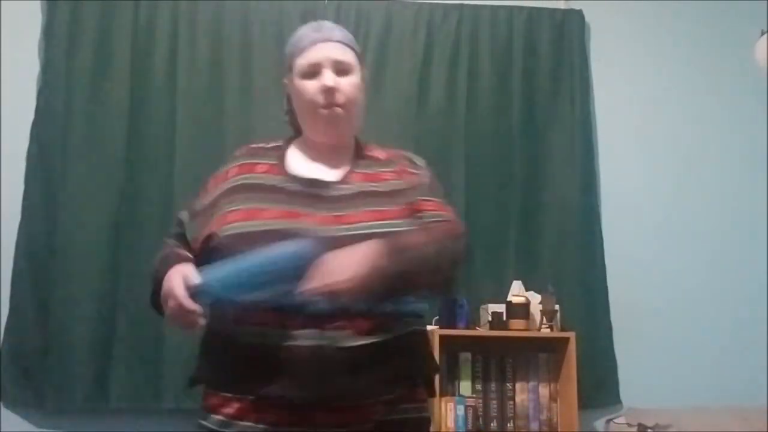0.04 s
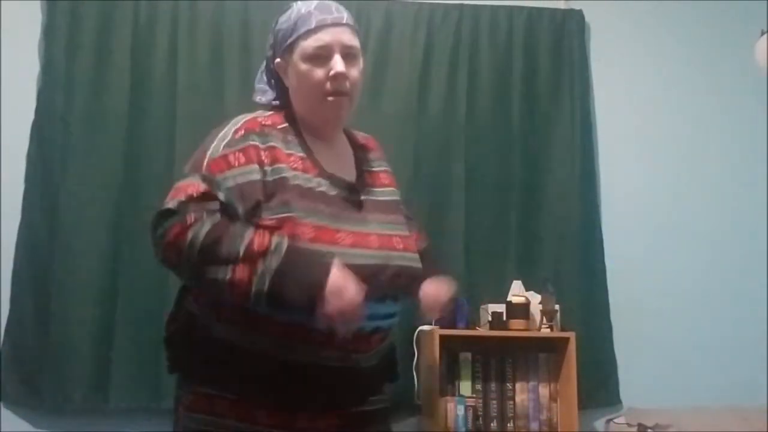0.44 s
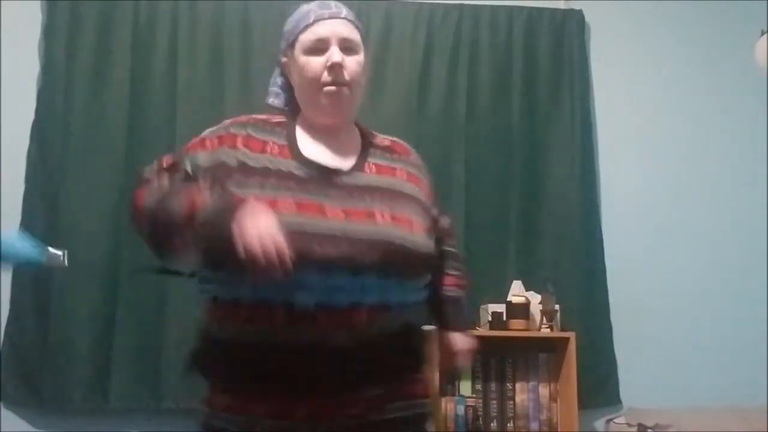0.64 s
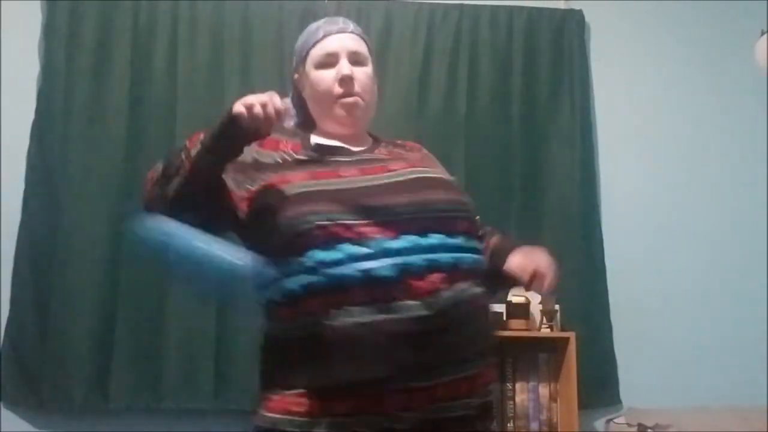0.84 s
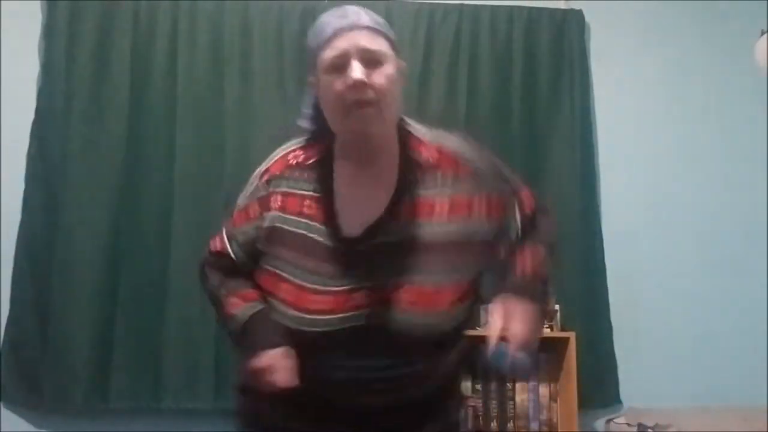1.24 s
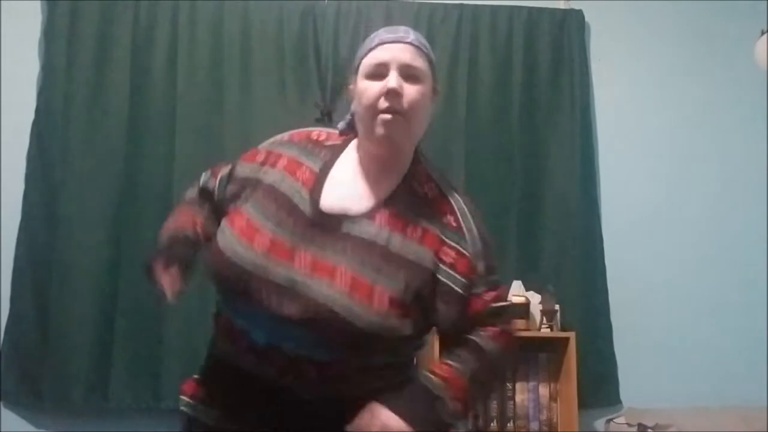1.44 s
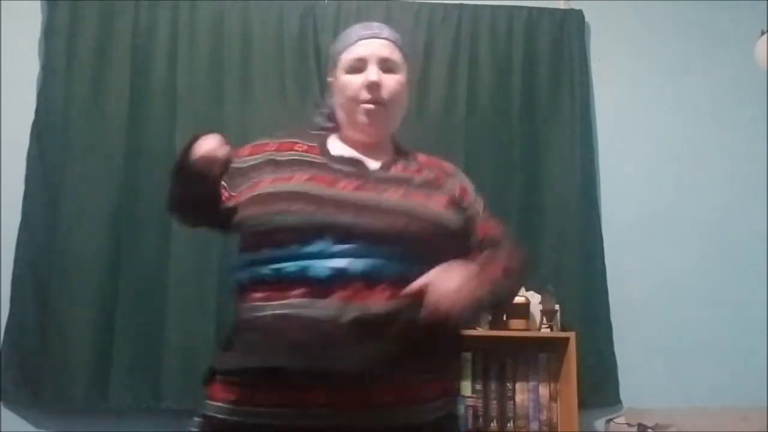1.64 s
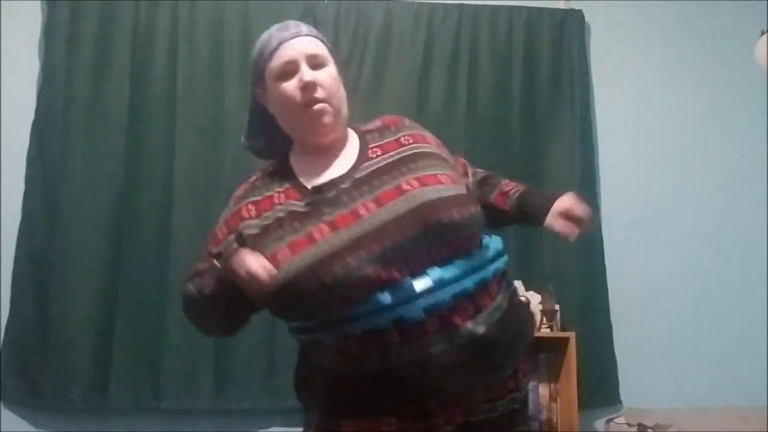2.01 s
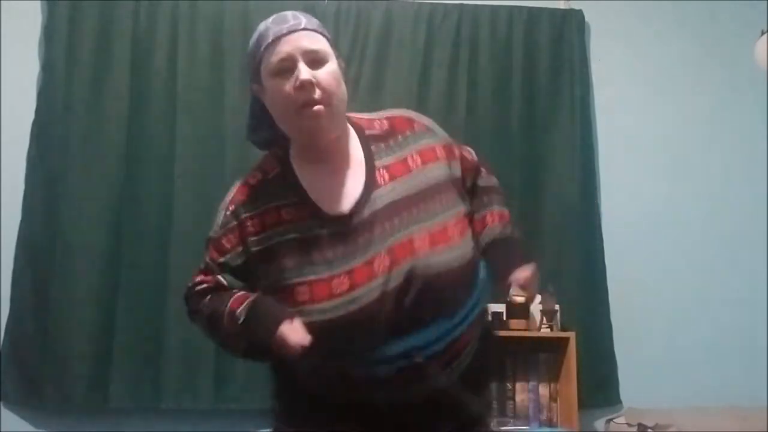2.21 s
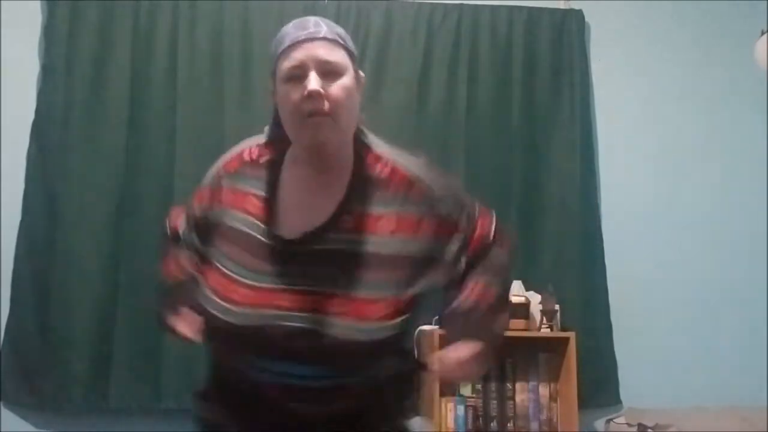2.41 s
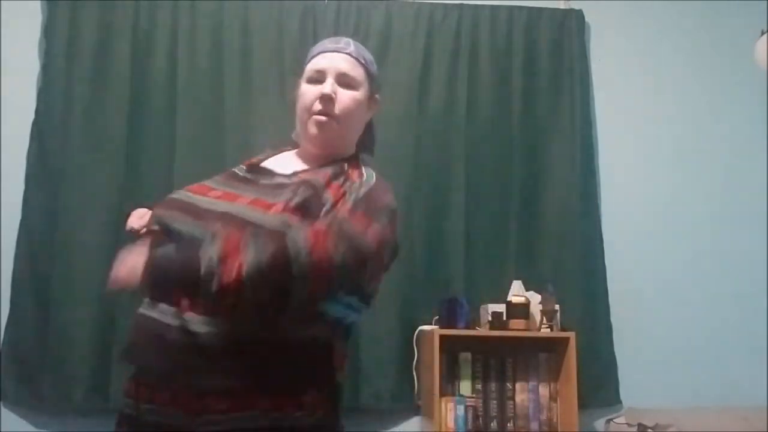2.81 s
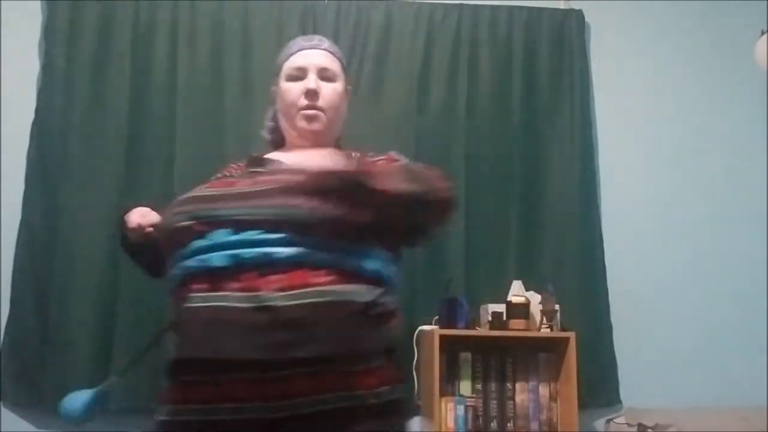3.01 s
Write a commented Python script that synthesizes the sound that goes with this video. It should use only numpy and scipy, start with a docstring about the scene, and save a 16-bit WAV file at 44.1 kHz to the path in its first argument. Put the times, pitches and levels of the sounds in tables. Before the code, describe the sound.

A weighted hoop spins around a person's waist in a small room, its wheels chattering along a hollow plastic track and clacking over the joints. A few faint, low thuds sound underneath before the rolling stops abruptly.

```python
"""A small room, where a weighted hoop circles a waist. The wheels of its weight roll round a hollow
plastic track, chattering in countless tiny impacts and clacking over the joints between the links,
until the rolling stops short. The plastic shell colours every hit, and single links resound hollowly
for a moment. Three soft, low thuds sound underneath, over a faint hush and rumble."""
import sys
import numpy as np
from scipy import signal
from scipy.fft import rfft, irfft, next_fast_len
from scipy.io import wavfile
from scipy.ndimage import uniform_filter1d, map_coordinates

SR = 44100
rng = np.random.default_rng(int(sys.argv[2]) if len(sys.argv) > 2 else 0)


def put_to_file(sound):
    """Save the sound as 16-bit audio at rate SR, in the file named by the first command-line argument."""
    columns = np.atleast_2d(sound).T  # one column per channel
    safe = np.clip(columns, -1, 1)
    whole_steps = np.round(safe * 32767)
    wavfile.write(sys.argv[1], SR, whole_steps.astype(np.int16))


N = 138915
TREBLE_HZ, TOP_HZ = 6500, 16000
CHATTER_PER_S = 4000
WALL_DELAY_S = 0.003


def amp(db):
    return 10 ** (np.asarray(db) / 20)


def rms(x):
    return np.sqrt(np.mean(abs(x) ** 2) + 1e-20)


def unit(x):
    return x / rms(x)


def along(points, hz):
    """Read a curve of (Hz, value) points on a log frequency axis."""
    freqs, values = np.transpose(points)
    return np.interp(np.log(hz + 1), np.log(freqs + 1), values)


def grid():
    """Frequencies of the padded spectrum, in Hz."""
    return np.fft.rfftfreq(2 * next_fast_len(N // 2 + SR // 4), 1 / SR)


def filtered(x, response):
    """Shape x with a response on the frequency grid."""
    return irfft(rfft(x, 2 * len(response) - 2) * response)[..., :N]


def resonance(hz, width_hz):
    """Band-pass response of one damped mode."""
    f = grid()
    return 1j * f * width_hz / (hz ** 2 - f ** 2 + 1j * f * width_hz)


def wobble(per_s):
    """A smooth random curve with per_s knots a second."""
    return map_coordinates(rng.standard_normal(2048), [np.arange(N) * per_s / SR], mode="wrap")


def add(bus, start_s, sound):
    """Mix a sound into the bus."""
    part = bus[..., max(round(start_s * SR), 0):][..., :sound.shape[-1]]
    part += sound[..., :part.shape[-1]]


def contacts(size, per_s, spread_db=4):
    """Tiny impacts of scattered strength at random moments, rms 1."""
    hit = rng.random(size) < per_s / SR
    polarity = np.sign(rng.standard_normal(size))
    return unit(hit * polarity * amp(spread_db * np.clip(rng.standard_normal(size), -2, 2)))


def diffuse(size):
    """Stereo noise, narrow in the bass and wide in the treble."""
    # left-right likeness of the room: freq_hz, correlation
    likeness = [(100, 0.69), (400, 0.46), (1000, 0)]
    angle = np.arccos(np.clip(along(likeness, np.fft.rfftfreq(size, 1 / SR)), -1, 1)) / 2
    mid, side = irfft(rfft(rng.standard_normal((2, size))) * [np.cos(angle), np.sin(angle)], size)
    return np.array([mid + side, mid - side])


def room_tone():
    """Faint hush over an uneven low rumble."""
    # colour of the hush: freq_hz, gain_db
    hush_eq = [(100, -11), (382, -23.5), (691, -23), (15800, -28)]
    # colour of the rumble: freq_hz, gain_db
    rumble_eq = [(25, -0.5), (50, 2), (110, 3), (150, -11.5), (1000, -67)]
    hush = filtered(diffuse(N), amp(along(hush_eq, grid())))
    rumble = filtered(diffuse(N), amp(along(rumble_eq, grid()))) * amp(1.8 * wobble(per_s=2.3))
    return amp(-69.5) * unit(hush) + amp(-70.5) * unit(rumble)


def joint_clacks():
    """A wheel scuffs up to a joint, cracks over it with a hollow knock, and the loose links rattle."""
    # wheel hits on joints: time_s, mid_db, treble_db, knock_hz, rattle_db (relative to the crack)
    hits = [(0.0234, -52, -88, 3530, -15), (0.0817, -48, -59, 3880, -16), (0.1024, -35.5, -56, 2930, -5),
            (0.168, -27, -42, 3470, -8.5), (0.1844, -21, -32.5, 3580, -4.5), (0.2, -17.5, -28, 4290, -5),
            (0.2686, -21, -47, 3660, -14), (0.6039, -19, -28.5, 3880, 0.5), (0.7454, -21.5, -35, 3700, -26),
            (0.7778, -27, -32, 3900, -3.5), (0.8095, -17.5, -25, 3200, -12), (0.901, -22.5, -40, 3240, -16),
            (0.9347, -20.5, -38, 3070, -8), (0.962, -15.5, -29, 3200, -4), (0.9762, -18, -33, 2930, -0.5),
            (1.0024, -14, -27, 3270, -9.5), (1.056, -13, -24, 5100, -8), (1.0926, -9.5, -24, 1860, -5.5),
            (1.1275, -17, -35, 3730, -0.5), (1.1372, -20, -35, 3260, -2), (1.172, -15.5, -33.5, 3090, -7.5),
            (1.2086, -20.5, -35, 3540, -4.5), (1.2558, -16.5, -30, 2660, -5.5),
            (1.292, -21, -40, 2985, 0.5), (1.722, -25.5, -46, 2560, -1.5), (1.7673, -17.5, -34, 3660, -17),
            (1.8147, -22.5, -33.5, 3600, -6), (1.8794, -20.5, -33.5, 3660, -11),
            (1.93, -18, -31.5, 3730, -7.5), (1.9702, -17, -38, 3930, -21),
            (1.9763, -17, -29.5, 4720, -13.5), (2.0368, -19.5, -38.5, 3720, -10),
            (2.1057, -20.5, -39.5, 3830, -10.5), (2.1136, -23.5, -34, 2820, -18),
            (2.1714, -20.5, -32, 3820, -12), (2.177, -20.5, -36, 3850, -20.5),
            (2.2285, -21.5, -30, 3640, -17), (2.274, -19.5, -38.5, 2156, -10.5),
            (2.32, -25, -43, 2810, -22.5), (2.3573, -27, -47, 3650, -17), (2.374, -24.5, -49, 3620, -9),
            (2.4313, -22, -38.5, 3380, -7.5), (2.465, -19.5, -31.5, 3450, -11),
            (2.5104, -15.5, -29, 3400, -10.5), (2.5511, -18.5, -34.5, 3690, -7.5),
            (2.633, -23, -32.5, 3720, -8), (2.7485, -26, -38, 3950, -16)]
    # band trims on every hit: mid_db, body_db, treble_db
    trim_db = [-2.5, -7.5, 5.5]
    scuff_s, rise_s, crack_s = 0.0007, 0.00057, 0.0017  # time constants
    rattle_t60_s, knock_t60_s = 0.05, 0.036
    low_cut_hz = 414  # the light links radiate little below this
    force, t = np.zeros((3, N)), np.arange(-SR // 50, SR // 10) / SR
    after = np.maximum(t, 0)
    attack = 1 - np.exp(-after / rise_s)
    for time_s, mid_db, treble_db, knock_hz, rattle_db in hits:
        scuff = amp(-13.5) * np.exp(-abs(t) / scuff_s) * rng.standard_normal(len(t))
        crack = np.sign(rng.standard_normal(len(t))) * np.exp(-after / crack_s)
        rattle = contacts(len(t), per_s=900) * amp(rattle_db - 60 * after / rattle_t60_s)
        side_modes_hz = knock_hz * np.exp(0.27 * rng.standard_normal(3))
        side_modes = amp(-10.5) * np.sin(2 * np.pi * np.outer(side_modes_hz, t)).sum(0)
        knock = (np.sin(2 * np.pi * knock_hz * t) + side_modes) * amp(-9 - 60 * after / knock_t60_s)
        blow = scuff + (crack + rattle + np.outer([0.5, 0, 0], knock)) * attack  # knock in the mids only
        roll_mid, roll_body, _ = roll_levels(time_s)  # the hit's low body follows the rolling's
        level_db = np.add([mid_db, mid_db + roll_body - roll_mid, treble_db], trim_db)
        add(force, time_s + t[0], amp(level_db)[:, None] * blow)
    return filtered(force, 1j * grid() / (low_cut_hz + 1j * grid()))


def plastic_track(force, body_hz=1700):
    """The hollow shell and its ringing links answer a force in three bands: mids, low body, treble."""
    # colour of the shell: freq_hz, gain_db
    shell_eq = [(88, -64.5), (150, -24.5), (264, -35.5), (430, -9.5), (564, -13.5), (727, -8), (1120, -10),
                (1590, -5.5), (3590, 0), (8470, -15), (14600, -16), (15800, -25)]
    # lingering modes of the links: pitch_hz, width_hz, strength
    link_modes = [(680, 33, 1), (1097, 100, 0.98), (1398, 19, 1), (2526, 90, 0.15), (3700, 44, .3),
                  (3910, 55, 0.3)]
    f = grid()
    shell = amp(along(shell_eq, f)) * (f + 1) ** 2 / (f ** 2 + 150 ** 2)  # low cut at 150 Hz
    # minimum phase, so the shell rings after a hit and not before it
    cepstrum = irfft(np.log(shell))
    half = len(cepstrum) // 2
    cepstrum[1:half] *= 2
    cepstrum[half + 1:] = 0
    ring = 1 + sum(strength * resonance(hz, width) for hz, width, strength in link_modes)
    colour = np.exp(rfft(cepstrum)) * ring * (f < TOP_HZ)
    body = 1 / (1 + (f / body_hz) ** 6)
    treble = 1 - 1 / (1 + (f / TREBLE_HZ) ** 6)
    bands = [1 - body - treble, body, treble]
    return sum(filtered(x, unit(colour * band)) for x, band in zip(force, bands))


def roll_levels(t):
    """Mid, low body and treble levels of the rolling at times t, in dB."""
    # swells of the rolling: time_s, mid_db, body_db, treble_db
    swells = [(.18, -50, -60, -49), (.22, -32.5, -43, -40.5), (.30, -34.5, -54, -45),
              (.38, -35.5, -49.5, -48), (.44, -34.5, -41.5, -40), (.482, -26, -34, -32),
              (0.545, -23.5, -33, -29), (.585, -29, -36.5, -34.5), (0.626, -24.5, -34, -29),
              (.66, -49, -60, -60), (.73, -37.5, -51, -52), (.8, -30, -45.5, -39.5), (.88, -46, -61.5, -54),
              (.94, -46, -63, -58), (1.0, -38.5, -50.5, -55), (1.15, -37.5, -45.5, -47),
              (1.36, -39.5, -50, -51.5), (1.5, -36, -43, -42.5), (1.592, -33.5, -44.5, -43.5),
              (1.659, -50.5, -55, -61.5), (1.71, -48.5, -56.5, -51.5), (1.79, -38.5, -43.5, -47.5),
              (1.87, -41, -51.5, -53), (1.974, -32.5, -46.5, -46.5), (2.1, -49.5, -60.5, -60.5),
              (2.19, -40, -57.5, -56), (2.31, -40.5, -55, -49), (2.45, -41, -47.5, -50.5),
              (2.64, -34.5, -42.5, -44), (2.739, -29.5, -39, -36.5), (2.88, -36, -46, -44.5)]
    # band trims on the swells: mid_db, body_db, treble_db
    trim_db = [-1, -0.5, 1.5]
    times, *curves = np.transpose(swells)
    return np.array([np.interp(t, times, curve) + db for curve, db in zip(curves, trim_db)])


def rolling_wheels():
    """The wheels chatter and drone on the track; a fast swing is louder and adds a bright whirr."""
    # wheel resonances: pitch_hz, width_hz, strength (negative cuts a dip)
    wheel_modes = [(950, 72, 0.3), (1700, 820, -0.23)]
    start_s, rise_s, stop_s, release_s = 0.15, 0.06, 2.895, 0.016
    flutter_db, full_whirr_db = 3.5, -23
    t = np.arange(N) / SR
    gate = np.clip((t - start_s) / rise_s, 0, 1) * amp(-20 * np.maximum(t - stop_s, 0) / release_s)
    chatter = contacts(N, CHATTER_PER_S) * amp(flutter_db * wobble(per_s=110))
    colour = 1 + sum(strength * resonance(hz, width) for hz, width, strength in wheel_modes)
    drone = unit(filtered(chatter, colour))
    level_db = roll_levels(t)
    whirr_gain = np.minimum(amp(level_db[0] - full_whirr_db), 1)  # rides the mid level
    whirr = whirr_gain * filtered(chatter, resonance(hz=5130, width_hz=2200))
    return amp(level_db) * gate * (drone + whirr)


def hollow_links(width_hz=190):
    """The shaken air and walls of single links resound for a moment, each at its own pitch."""
    # resonances that swell as the wheels pass: start_s, end_s, pitch_hz, level_db
    passes = [(.17, 0.503, 916, -47), (.46, 0.656, 4110, -31), (1.012, 1.04, 2180, -32.5),
              (1.03, 1.25, 1660, -52), (1.29, 1.52, 1290, -48.5), (1.72, 2.06, 3800, -47),
              (2.018, 2.09, 2270, -41.5), (2.2, 2.44, 1026, -46.5), (2.24, 2.924, 3620, -44),
              (2.43, 2.605, 1025, -41), (2.59, 2.844, 1450, -43), (2.825, 2.887, 2624, -35.5),
              (2.85, 2.913, 760, -43)]
    t, f, out = np.arange(N) / SR, grid(), np.zeros(N)
    for start_s, end_s, pitch_hz, level_db in passes:
        band = filtered(contacts(N, CHATTER_PER_S), 1 / (1 + ((f - pitch_hz) / width_hz) ** 2) ** 2)
        swell = np.sin(np.pi * np.clip((t - start_s) / (end_s - start_s), 0, 1))
        out += amp(level_db) * unit(band * swell) * rms(swell)
    return out


def floor_thuds(attack_s=0.014, t60_s=0.13):
    """Dull, toneless bumps, as of weight shifting on the floor."""
    # soft bumps: start_s, level_db (at their height)
    bumps = [(0.644, -52.5), (1.696, -50.5), (1.84, -49.5)]
    # colour of a bump: freq_hz, gain_db
    thud_eq = [(60, -17.5), (105, 4.5), (160, -15), (230, -6.5), (380, -22), (900, -63)]
    out, t = np.zeros(N), np.arange(SR // 4) / SR
    push = (1 - np.exp(-t / attack_s)) ** 2 * amp(-60 * t / t60_s)
    for start_s, level_db in bumps:
        boom = filtered(rng.standard_normal(N), amp(along(thud_eq, grid())))[:len(t)]
        add(out, start_s, amp(level_db) * unit(boom * push) * rms(push) / push.max())
    return out


def circling(x, turn_hz=1.316, max_lag_s=0.00007):
    """The direct sound of the circling weight reaches first one microphone, then the other."""
    n = np.arange(N)
    lag = max_lag_s * SR * np.sin(2 * np.pi * turn_hz * n / SR) / 2
    return np.array([map_coordinates(x, [n + side * lag]) for side in (1, -1)])


def wall_echoes(x, count=10, latest_s=0.022):
    """Dull early reflections, different on each side."""
    f = grid()
    delays = rng.uniform(WALL_DELAY_S, latest_s, (count, 2, 1))
    taps = sum(np.exp(-2j * np.pi * f * delay) for delay in delays) / np.sqrt(count)
    return np.array([filtered(x, side / (1 + 1j * f / TREBLE_HZ)) for side in taps])


def room_tail(x, frame=256):
    """The source keeps moving, so the room answers with ever new diffuse sound, fading band by band."""
    # reverb time of the room: freq_hz, t60_s
    decay = [(150, 0.094), (600, 0.13), (1700, 0.18), (2600, 0.27), (3800, 0.23), (7000, 0.19),
             (15000, 0.19)]
    delayed = np.pad(x, (round(WALL_DELAY_S * SR), 0))[:N]
    hz, t, spectrum = signal.stft(delayed, SR, nperseg=frame)
    power = uniform_filter1d(abs(spectrum) ** 2, size=2, axis=0)
    feedback = amp(-60 * t[1] / along(decay, hz)) ** 2  # share of the power left after one hop
    stored = np.array([signal.lfilter([1 - k], [1, -k], band) for k, band in zip(feedback, power)])
    field = signal.stft(diffuse(N + 1)[:, :N], SR, nperseg=frame)[2]
    tail = signal.istft(field * np.sqrt(abs(stored)), SR, nperseg=frame)[1][:, :N]
    return unit(tail) * np.std(x)


def scene():
    """The hoop, direct and off the walls, over the thuds and the room tone."""
    roll = plastic_track(rolling_wheels()) + hollow_links()
    clacks = plastic_track(joint_clacks())
    direct = circling(amp(-5.5) * roll + amp(-2.5) * clacks)
    echoes = amp(-7) * wall_echoes(roll + clacks)
    reverb = room_tail(amp(-2.5) * roll + amp(-1.5) * clacks)
    return direct + echoes + reverb + floor_thuds() + room_tone()


def record(dry):
    """The left microphone is the more sensitive; nothing passes above TOP_HZ."""
    # lean of the stereo image: freq_hz, left_over_right_db
    balance = [(60, 0), (110, 4), (700, 6), (1290, 3), (2380, 7.5), (4400, 6), (8120, 9.5), (15000, 3.5)]
    f = grid()
    lean_db = along(balance, f) / 2
    return np.array([filtered(x, amp(side * lean_db) * (f < TOP_HZ)) for x, side in zip(dry, (1, -1))])


dry = scene()
out = record(dry)
put_to_file(out)
```